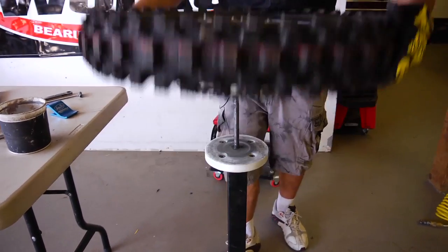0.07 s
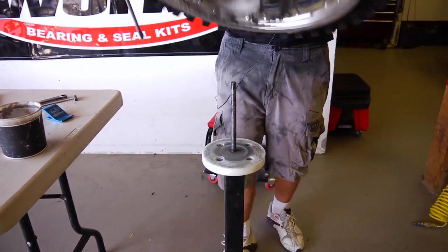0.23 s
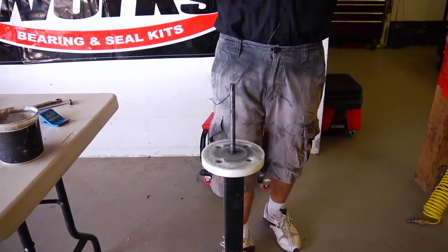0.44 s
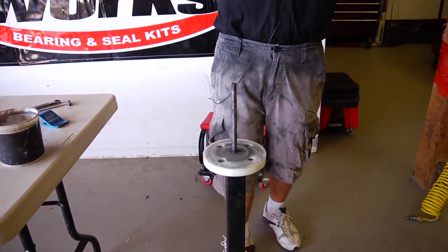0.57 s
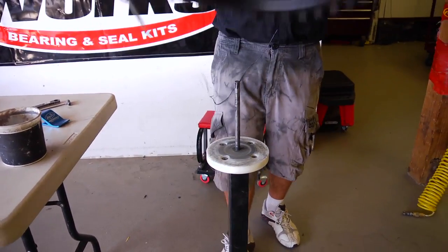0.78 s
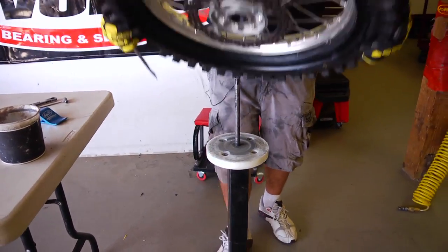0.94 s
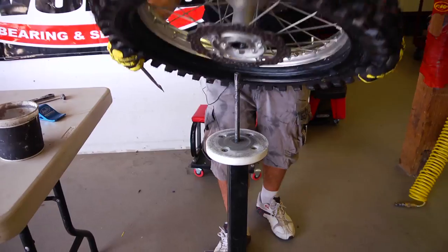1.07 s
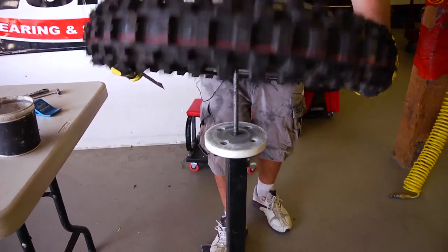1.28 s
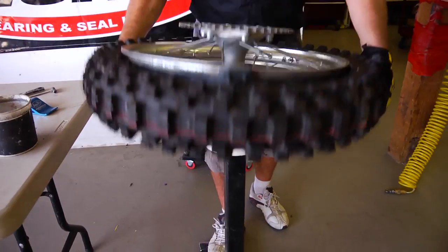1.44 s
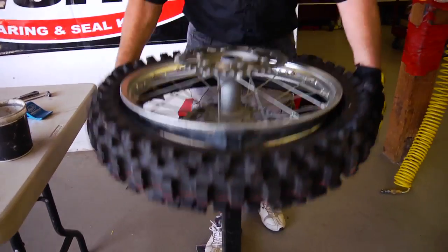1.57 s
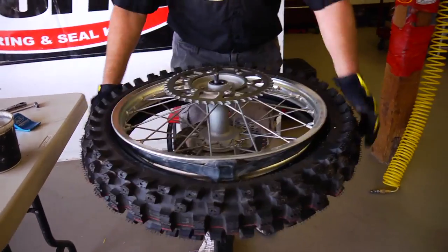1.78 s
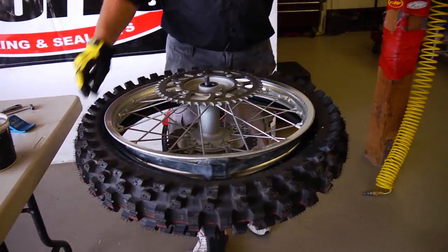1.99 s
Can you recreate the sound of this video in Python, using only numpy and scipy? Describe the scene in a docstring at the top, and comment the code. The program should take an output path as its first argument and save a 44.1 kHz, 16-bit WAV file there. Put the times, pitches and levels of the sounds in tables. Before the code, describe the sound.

Close in a small echoing workshop, a wheel hub scrapes sharply off a metal stand, handling bumps and faint ticks fill a quiet gap, then a short rasp and a heavy, ringing thud as it drops back.

```python
"""A spoked wheel is pulled off the threaded rod of a steel stand, turned over and dropped back on, in a workshop.
First the hub rasps and squeals along the rod, whose catches excite its resonances, over ringing metal modes.
Then low thuds, ticks, brushes of hiss and the swung wheel's air, as lumpy low noise, are heard as it turns.
At 1.5 s the hub rasps back on, and at 1.76 s the tyre thuds home as a damped low tone and the metal rings again.
Echoes of the shop, a noise floor and mains hum lie under it all."""
import sys
import numpy as np
from scipy import signal
from scipy.fft import rfft, irfft, next_fast_len
from scipy.io import wavfile

SR = 44100
rng = np.random.default_rng(int(sys.argv[2]) if len(sys.argv) > 2 else 0)


def to_wav(sig):
    """Store sig (one row per channel, or 1-D mono) as 16-bit WAV at the path in sys.argv[1].

    Samples outside -1..1 are clipped; the rate is SR.
    """
    pcm = np.clip(np.atleast_2d(sig), -1, 1) * 32767
    pcm = np.round(pcm).astype(np.int16)
    wavfile.write(sys.argv[1], SR, pcm.T)  # frames by channels


def voltage_ratio(level):
    """Linear amplitude factor for a level in decibels (scalar or array-like)."""
    return 10 ** (np.asarray(level, float) / 20)


N = 89037  # length in samples


def rms_one(x):
    """Scale to rms 1."""
    return x / np.sqrt(np.mean(x ** 2) + 1e-20)


def coloured(x, spectrum, low_hz=0., high_hz=30000.):
    """Weight x by a spectrum in (Hz, dB) between two steep edges, then scale to rms 1."""
    hz = np.arange(1, N // 2 + 2) * SR / N
    f, db = np.transpose(spectrum)
    edges = 1 / np.sqrt((1 + (low_hz / hz) ** 8) * (1 + (hz / high_hz) ** 8))
    weight = voltage_ratio(np.interp(np.log(hz), np.log(f), db)) * edges
    return rms_one(irfft(rfft(x) * weight, N))


def drift(rate_hz):
    """Slow random wandering of spread 1: noise smoothed twice above rate_hz."""
    r = np.exp(-80 * np.pi * rate_hz / SR)
    # made at every 40th sample; the first 2000 values let the filter settle
    slow = signal.lfilter([1], [1, -2 * r, r * r], rng.standard_normal(N // 40 + 2002))[2000:]
    return np.interp(np.arange(N) / 40, np.arange(len(slow)), rms_one(slow))


def ring(x, hz, t60):
    """A resonance: a unit click sets a sine of height 1 ringing, which falls 60 dB in t60 seconds."""
    r, w = voltage_ratio(-60 / (t60 * SR)), 2 * np.pi * hz / SR
    return signal.lfilter([0, np.sin(w)], [1, -2 * r * np.cos(w), r * r], x + 1e-18)


# Rasps of hub on rod. Each entry: level of the low band over the middle one in dB, then its rows.
# Each row: time in seconds, level of the middle band in dB, treble over that level in dB.
RASP_ROWS = [(-3.5, [(0, -40.5, -2), (.034, -34.5, -13), (.037, -29.5, -8.5), (.05, -31.5, -6),
             (.06, -33.5, -12.5), (.1, -55, 1)]), (-13.5, [(.149, -24.5, -4), (.168, -26.5, -5),
             (.176, -21, -5), (.186, -21, 0), (.2, -24.5, 4.5), (.212, -33.5, 3.5), (.278, -47.5, 1)]),
             (1, [(.781, -50.5, -32), (.79, -38.5, -13), (.81, -52, -16), (.828, -62, -25)]),
             (-42, [(.938, -54.5, -4), (.966, -50.5, -25), (1.012, -50, -26), (1.03, -45, -11),
             (1.044, -51.5, -17), (1.066, -67, -5)]), (-31.5, [(1.513, -19.5, -28), (1.521, -19, -16),
             (1.541, -25.5, -15), (1.553, -21.5, -15), (1.567, -27.5, -21), (1.611, -53, -4),
             (1.68, -52, -30)]), (-2, [(1.759, -6.5, -29), (1.765, -29.5, -7.5), (1.779, -26, -5),
             (1.79, -27, -11), (1.8, -25, -18), (1.815, -29.5, -17), (1.833, -36, -41), (1.838, -28.5, -14),
             (1.85, -35.5, -16), (1.907, -48, -22)])]
# Edges of the low, middle and treble bands, in Hz.
RASP_BAND_EDGES = [300, 1200, 5000, 16500]
# Tone colour of the rasps. Each row: frequency in Hz, relative level in dB.
RASP_SPECTRUM = [(180, -71), (300, 14), (1430, 3), (2030, 6), (2400, 1.5), (5370, -21.5), (6670, -15.5),
                 (13000, -34), (15700, -21.5), (16500, -57)]
# Short resonances of the hub while it touches the rod. Each row: frequency in Hz, width in Hz, middle level in dB.
HUB_RESONANCES = [(1036, 72, 4), (1607, 30, 5.5), (1697, 17.2, 16), (2050, 40, 11.5), (2761, 51, 6.5),
                  (3700, 26, 0.5), (4150, 124, 8.5), (4550, 350, 4), (5253, 90, 13.5), (5720, 98, 10.5),
                  (6125, 90, 6), (8225, 100, 1.5), (12540, 1500, 13)]


def rasps():
    """Dense catches of the hub on the thread, in three bands, through the hub's short resonances."""
    catches_per_s, catch_spread_db = 4500, 3
    bare_db = -6  # the catches without resonance
    shift_db, shift_hz = 4, 25  # each resonance comes and goes as the contact shifts
    rise_s, fade_s = 0.0038, 0.025
    t, out = np.arange(N) / SR, np.zeros(N)
    sizes = voltage_ratio(catch_spread_db * np.minimum(rng.exponential(1, N), 4)) * rng.choice([-1, 1], N)
    catches = sizes * (rng.random(N) < catches_per_s / SR)
    body = voltage_ratio(bare_db) * catches
    for hz, width_hz, db in HUB_RESONANCES:
        t60 = np.log(1000) / (np.pi * width_hz)
        peak_one = 2 * np.pi * width_hz / SR  # brings the resonance's peak gain to about 1
        body += voltage_ratio(db + shift_db * drift(shift_hz)) * peak_one * ring(catches, hz, t60)
    low, mid, high = [coloured(body, RASP_SPECTRUM, a, b)
                      for a, b in zip(RASP_BAND_EDGES, RASP_BAND_EDGES[1:])]
    for low_db, rows in RASP_ROWS:
        s, level_db, high_db = np.transpose(rows)
        gate = np.clip((t - s[0]) / rise_s, 0, 1) * np.exp(-np.maximum(t - s[-1], 0) / fade_s)
        bands = mid + voltage_ratio(low_db) * low + voltage_ratio(np.interp(t, s, high_db)) * high
        out += gate * voltage_ratio(np.interp(t, s, level_db)) * bands
    return out


# Knocks that leave the metal ringing.
# Each row: start in seconds, contact length in seconds, share of the free ringing time.
KNOCK_ROWS = [(-.03, 0.032, 1.37), (0.142, 0.084, 1.7), (1.514, 0.018, 0.96), (1.762, 0.0077, 0.61)]
# Modes of wheel and stand: their frequencies in Hz.
MODE_HZ = [463, 646, 797, 872, 911, 1014, 1339, 1344, 1551, 1853, 2027, 2480, 2530, 2612, 2732, 2914, 4484,
           5383, 5700]
# Each row, one per mode: free time to fall 60 dB in seconds, then level in dB after each of the four knocks.
MODE_ROWS = [(1.26, -69, -67, -73, -35), (0.82, -38.5, -57, -43.5, -24.5), (0.12, -39, -31, -37, -56),
             (0.93, -53, -39, -75, -64), (3.2, -73, -54, -53.5, -48.5), (0.73, -27, -48.5, -32, -30),
             (1.34, -47.5, -44.5, -32, -28), (11, -71.5, -54.5, -43.5, -52), (1, -63, -75, -40, -49),
             (1.47, -39, -52, -27, -37), (0.44, -29, -67, -19.5, -59), (0.46, -43, -42.5, -56, -62),
             (2.5, -42.5, -49.5, -46, -49), (0.75, -39, -49, -36.5, -38.5), (0.17, -43, -62, -48, -57),
             (0.33, -42, -46.5, -35.5, -36.5), (1.18, -47.5, -54.5, -56.5, -56), (0.22, -46, -45, -64, -65),
             (0.39, -47, -46, -47, -68)]
# The higher modes while the wheel is turned in the air. Each row: time in seconds, change of level in dB.
TURN_ROWS = [(.3, 2), (.41, 4), (.52, -11.5), (.6, 2.5), (.76, -7.5), (1.0, 2.5), (1.3, -5.5)]


def ringing():
    """Each knock builds the modes up during contact and chokes what rang before."""
    # hands close on the wheel and quieten its modes; those of the stand, which ring longer, go on
    grip_s, grip_db_per_s_per_khz, stand_t60_s = 0.52, 60, 2.4
    turn_above_hz = 1200
    waver_db, waver_hz = 1.8, 5
    t, out = np.arange(N) / SR, np.zeros(N)
    in_air = (t > KNOCK_ROWS[1][0]) * (t < KNOCK_ROWS[2][0])
    turn_db = np.interp(t, *np.transpose(TURN_ROWS)) * in_air
    phases = rng.uniform(0, 2 * np.pi, (len(MODE_ROWS), len(KNOCK_ROWS)))
    for hz, (t60, *levels), row in zip(MODE_HZ, MODE_ROWS, phases):
        mode = np.zeros(N)
        for (s, length, share), db, phase in zip(KNOCK_ROWS, levels, row):
            built = np.clip((t - s) / length, 0, 1)
            decay_db = db - 60 * np.maximum(t - s - length, 0) / (t60 * share)
            if s < grip_s and t60 < stand_t60_s:
                decay_db = decay_db - grip_db_per_s_per_khz * hz / 1000 * np.maximum(t - grip_s, 0)
            struck = np.sqrt(built) * voltage_ratio(decay_db) * np.sin(2 * np.pi * hz * t + phase)
            mode = mode * (1 - built) + struck
        if hz > turn_above_hz:
            mode = mode * voltage_ratio(turn_db)
        out += mode * voltage_ratio(waver_db * drift(waver_hz))
    return out


# Dull thuds of rubber and frame.
# Each row: start in seconds, level in dB ahead of rise and decay, frequency in Hz, time to fall 60 dB in seconds.
THUD_ROWS = [(0.046, -17.5, 417, 0.032), (0.178, -24.5, 273, 0.092), (0.3, -9.5, 159, 0.037),
             (0.304, -19.5, 258, 0.028), (0.381, -33, 150, 0.036), (0.707, -13, 220, 0.0068),
             (0.735, -25.5, 197, 0.05), (0.736, -27, 384, 0.055), (1.763, 4.5, 321, 0.021),
             (1.764, -26.5, 141, 0.72), (1.771, -25.5, 491.2, 0.3), (1.835, -6.5, 258, 0.022),
             (1.838, -27, 618, 0.31)]


def thuds():
    """A soft push builds up one low, damped resonance."""
    rise_cycles = 0.54
    t, out = np.arange(N) / SR, np.zeros(N)
    for s, db, hz, t60 in THUD_ROWS:
        age = np.maximum(t - s, 0)
        rise = 1 - np.exp(-age * hz / rise_cycles)
        out -= voltage_ratio(db - 60 * age / t60) * rise * np.sin(2 * np.pi * hz * age)
    return out


# Small ticks. Each row: start in seconds, level of the crack in dB (noise of rms 0.28 is 0 dB),
# level of the ring in dB ahead of its soft start, frequency of the ring in Hz.
TICK_ROWS = [(0.599, -30, -24, 2300), (.657, -56, -24, 930), (0.702, -56, -25, 1470),
             (.790, -27, -11, 1950), (0.808, -40, -19, 1930), (0.942, -21.5, -25, 2020),
             (0.964, -42, -15, 2320), (0.986, -34, -17, 2050), (1.026, -34, -14, 2175),
             (1.071, -47, -42, 2250), (1.239, -36, -68, 12500), (1.838, -22, -14, 3330),
             (1.994, -39, -43, 3600)]


def ticks():
    """Small parts tick: a crack of bright noise and a few cycles of ringing."""
    crack_s, ring_rise_s = 0.00083, 0.003
    ring_cycles = 10  # cycles in which the ring falls 60 dB
    t, out = np.arange(N) / SR, np.zeros(N)
    grit = np.diff(rng.standard_normal(N + 1)) / 5
    for s, crack_db, ring_db, hz in TICK_ROWS:
        click = np.zeros(N)
        click[int(s * SR)] = 1
        crack = grit * (t >= s) * np.exp(-np.maximum(t - s, 0) / crack_s)
        tone = ring(click, hz, ring_cycles / hz) * np.clip((t - s) / ring_rise_s, 0, 1)
        out += voltage_ratio(crack_db) * crack + voltage_ratio(ring_db) * tone
    return out


# Squeals of the hub slipping on the thread, and one high squeak.
# Each row: start in seconds, length in seconds, level in dB, frequency in Hz at the start and at the end.
SQUEAK_ROWS = [(0.019, 0.015, -36.5, 2700, 2720), (.168, 0.022, -18, 2147, 1738),
               (1.036, .03, -70, 9400, 9500), (1.515, 0.026, -26, 2610, 2630),
               (1.539, .018, -17, 1642, 1575), (1.762, 0.0081, -26, 3630, 3680)]


def squeaks():
    """Brief gliding tones, rough because their level wanders fast."""
    rough_db, rough_hz, fade_s = 3, 150, 0.0025
    t, out = np.arange(N) / SR, np.zeros(N)
    rough = voltage_ratio(rough_db * drift(rough_hz))
    for s, length, db, hz, end_hz in SQUEAK_ROWS:
        turns = (t - s) * (hz + (end_hz - hz) * (t - s) / length / 2)
        gate = np.clip(np.minimum(t - s, s + length - t) / fade_s, 0, 1)
        out += voltage_ratio(db) * gate * rough * np.sin(2 * np.pi * turns)
    return out


# Soft brushes of cloth or glove. Each row: start in seconds, length in seconds, top level in dB.
BRUSH_ROWS = [(0.385, 0.2, -58.5), (0.648, 0.1, -56.5), (0.779, 0.046, -49), (0.95, 0.0082, -52),
              (1.574, 0.062, -49), (1.819, 0.065, -49)]
# Tone colour of the brushes. Each row: frequency in Hz, relative level in dB.
BRUSH_SPECTRUM = [(2940, 5), (5000, -8.5), (9860, 0), (13600, 3.5), (16000, -25), (16500, -32)]


def brushes():
    """High hiss that swells and fades."""
    t, swell = np.arange(N) / SR, np.zeros(N)
    for s, length, db in BRUSH_ROWS:
        arch = np.sin(np.pi * np.clip((t - s) / length, 0, 1)).clip(0)
        swell += voltage_ratio(db) * np.sqrt(arch)
    return swell * coloured(rng.standard_normal(N), BRUSH_SPECTRUM)


# Air of the swung wheel on the microphone. Each row: time in seconds, level in dB.
BUFFET_ROWS = [(0, -49), (.16, -58.5), (.18, -35.5), (0.199, -34), (.23, -65), (0.271, -42), (0.299, -25),
               (.36, -39.5), (0.409, -28.5), (.46, -39), (.5, -37), (.57, -43.5), (.64, -53.5),
               (0.739, -39), (.79, -51.5), (1.13, -61), (1.18, -44.5), (1.22, -43), (1.3, -49), (1.41, -55),
               (1.5, -66), (1.521, -50.5), (1.57, -59.5), (1.755, -62), (1.768, -28), (1.82, -38),
               (2.02, -53.5)]
# Tone colour of that air. Each row: frequency in Hz, relative level in dB.
BUFFET_SPECTRUM = [(12, -58.5), (20, -3), (56, 7), (81, 11.5), (195, 2.5), (232, -1), (500, -28.5),
                   (650, -91.5), (1100, -120)]


def buffet():
    """Lumpy low noise of air on the microphone."""
    lump_db, lump_hz = -0.5, 25
    s, db = np.transpose(BUFFET_ROWS)
    air = coloured(rng.standard_normal(N), BUFFET_SPECTRUM)
    lumps = rms_one(air * voltage_ratio(lump_db * drift(lump_hz)))
    return voltage_ratio(np.interp(np.arange(N) / SR, s, db)) * lumps


def shop(x):
    """Echoes of the workshop: ten feedback delays, duller on every round."""
    t60_s, wall_cut_hz, level_db = 0.42, 14000, -22
    size = next_fast_len(N + SR)  # room for the tail
    hz = np.arange(size // 2 + 1) * SR / size
    dull = 1 / (1 + 1j * hz / wall_cut_hz)
    echo = 0
    for k, lag_s in enumerate(rng.uniform(.015, .05, 10)):
        loop = voltage_ratio(-60 * lag_s / t60_s) * dull * np.exp(-2j * np.pi * hz * lag_s)
        echo = echo + (-1) ** k * loop / (1 - loop)
    return voltage_ratio(level_db) * irfft(rfft(x, size) * echo, size)[:N]


# Tone colour of the noise floor. Each row: frequency in Hz, relative level in dB.
FLOOR_SPECTRUM = [(59, -16.5), (100, -5), (541, -5.5), (903, -9), (1240, -9.5), (1350, -16), (1750, -15),
                  (2460, -19), (13600, -29), (16500, -22)]


def noise_floor():
    """Steady coloured noise of the room, at -57.5 dB."""
    return voltage_ratio(-57.5) * coloured(rng.standard_normal(N), FLOOR_SPECTRUM)


# Mains hum. Each row: frequency in Hz, level in dB.
HUM_ROWS = [(120, -57.5)]


def mains_hum():
    """A steady sine for each row of the hum."""
    t = np.arange(N) / SR
    return sum(voltage_ratio(db) * np.sin(2 * np.pi * hz * t) for hz, db in HUM_ROWS)


def scene():
    """Wheel and stand in the shop, with air and room tone; the echoes leave out ringing and air."""
    struck = rasps() + thuds() + ticks() + squeaks() + brushes()
    mix = struck + shop(struck) + ringing() + buffet() + noise_floor() + mains_hum()
    return mix[None]


def roll_off(x):
    """The treble ends steeply here."""
    return signal.sosfilt(signal.butter(12, 16830, fs=SR, output="sos"), x)


def record(dry):
    """The microphone loses both ends of the range."""
    low_cut = signal.butter(2, 41.5, "high", fs=SR, output="sos")
    high_cut = signal.cheby2(10, 50, 16790, fs=SR, output="sos")  # 50 dB down from 16790 Hz up
    mix = signal.sosfilt(np.vstack([low_cut, high_cut]), dry)
    return roll_off(mix)


dry = scene()
out = record(dry)
to_wav(out)
```